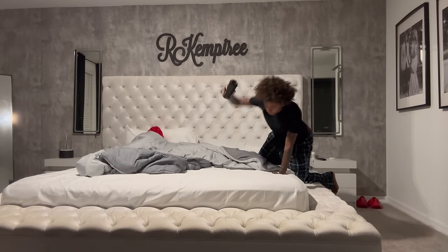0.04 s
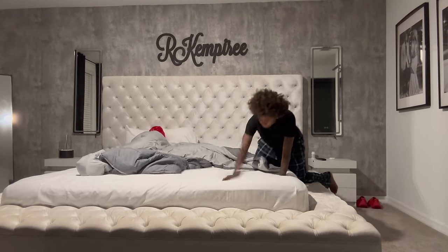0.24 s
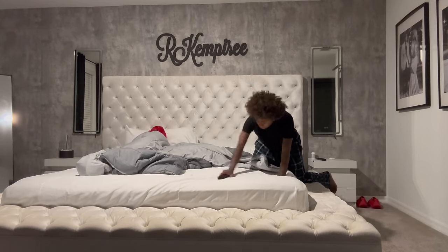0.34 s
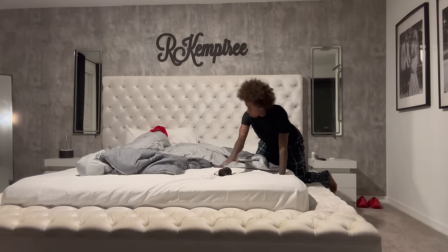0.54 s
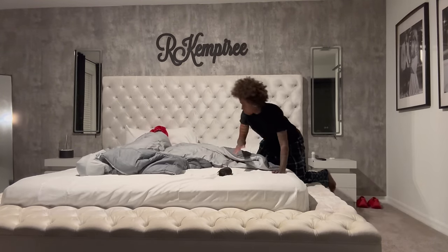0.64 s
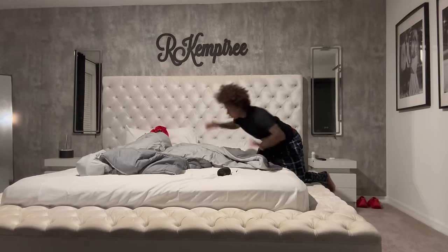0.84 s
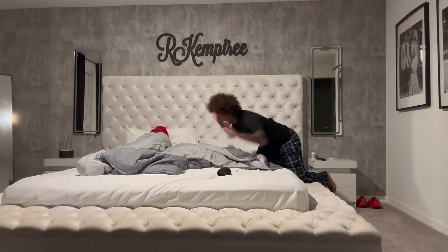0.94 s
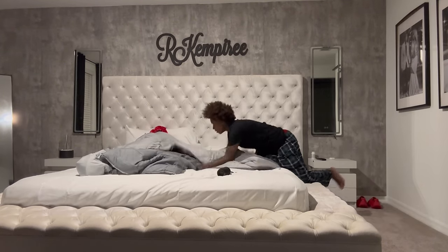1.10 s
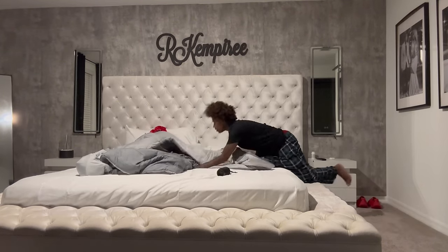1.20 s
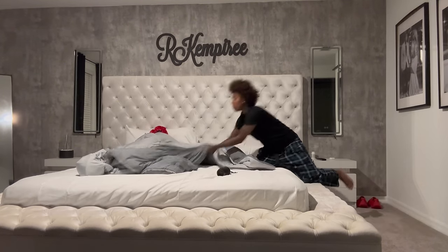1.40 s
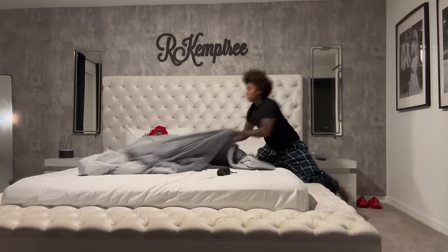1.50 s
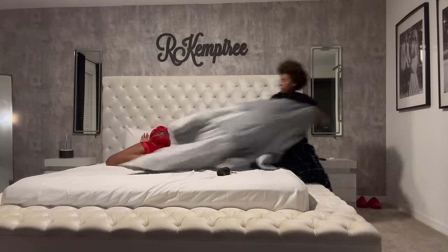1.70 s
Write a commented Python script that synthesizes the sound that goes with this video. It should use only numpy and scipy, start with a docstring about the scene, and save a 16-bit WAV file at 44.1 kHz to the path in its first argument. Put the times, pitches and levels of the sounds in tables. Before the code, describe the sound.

A flat hand slaps a mattress at about 0.24 s: a loud, padded smack with a boomy bed ring fading within half a second. Faint cloth brushes follow. Near 1.04 s a softer pat, hollow knock and low thuds mark a lunge onto the comforter. From 1.3 s to the end it is pulled away, quietly billowing, swishing and crinkling, with dull thuds near 1.6 s. Small room, low hush.

```python
"""A flat hand slaps a mattress: a padded smack of shaped noise, with the bed ringing on as fading tones.
Someone kneeling on the bed then lunges onto the comforter, heard as a soft pat, low thuds and a hollow
knock, and pulls it away: noise that billows and swishes, and a dense crackle of tiny clicks that crinkles.
Small ticks, brushes, knocks and rustles of noise fill in around these, over a steady hush.
A small, fairly bare bedroom adds a fading tail to all but the hush, the thuds and the bed's ringing."""
import sys
import numpy as np
from scipy import signal
from scipy.fft import rfft, irfft
from scipy.io import wavfile

SR = 44100
rng = np.random.default_rng(int(sys.argv[2]) if len(sys.argv) > 2 else 0)


def inscribe(sig):
    """Save sig as 16-bit PCM at rate SR to the path in sys.argv[1].

    A 1-D sig is mono; a 2-D sig holds one channel per row.
    Samples are clipped to [-1, 1] before scaling.
    """
    pcm = np.round(np.clip(np.atleast_2d(sig).T, -1, 1) * 32767)
    wavfile.write(sys.argv[1], SR, pcm.astype(np.int16))


N = 77175  # length [samples]


def amp(db):
    """Turns decibels into a gain."""
    return 10 ** (np.asarray(db) / 20)


def read(points, hz):
    """Reads a table between its points, with frequency on a log scale."""
    f, value = np.transpose(points)
    return np.interp(np.log(hz + 1), np.log(f + 1), value)


def since(s):
    """Seconds passed since time s, zero before it."""
    return np.maximum(np.arange(N) / SR - s, 0)


def stroke(s, rise, hold, fall):
    """Loudness shape: a straight rise, then an exponential fall from `hold` seconds after the start."""
    t = since(s)
    return np.minimum(t / rise, 1) * np.exp(-np.maximum(t - hold, 0) / fall)


# How wide the stereo is, as side against middle: (frequency [Hz], level [dB])
STEREO_WIDTH = [(60, -12.5), (110, -11), (200, -10), (380, -9), (700, 1), (1300, -4), (4000, 2),
                (15000, -1)]


def coloured(colour, drive=None):
    """Filters noise (or `drive`) to a spectrum, near mono in the bass and wide in the treble."""
    hz = np.fft.rfftfreq(N, 1 / SR)
    if drive is None:
        drive = rng.standard_normal((2, N))
    mid, side = rfft(drive) * amp(read(colour, hz))
    side = side * amp(read(STEREO_WIDTH, hz))
    left_right = irfft([mid + side, mid - side], N)
    return left_right / np.std(irfft(mid, N))  # only the shape of the colour counts, not its level


# How long the bedroom takes to fade by 60 dB: (frequency [Hz], time [s])
ROOM_FADE = [(60, 0.69), (150, 0.47), (400, 0.3945), (900, 0.2744), (2000, 0.41), (5000, 0.3324),
             (12000, 0.32)]


def room(x, wet_db, gap_s=0.0045):
    """Adds the bedroom's diffuse tail: noise after a short gap, each band dying at its own speed."""
    hz, t, (mid, side) = signal.stft(rng.standard_normal((2, N)), SR, nperseg=1024)
    width = amp(read(STEREO_WIDTH, hz))[:, None]
    bands = np.array([mid + width * side, mid - width * side]) / np.sqrt(1 + width ** 2)
    decay = amp(-60 * t / read(ROOM_FADE, hz)[:, None])
    tail = signal.istft(bands * decay, SR, nperseg=1024)[1][:, :N]
    tail = tail * stroke(gap_s, 0.0034, 2, 1)  # the hold outlasts the sound: this only shapes the start
    tail = tail / np.linalg.norm(tail[0])
    return x + amp(wet_db) * signal.fftconvolve(x, tail, axes=1)[:, :N]


# Spectrum of the quiet room: (frequency [Hz], relative level [dB per Hz])
HUSH_COLOUR = [(20, -26), (40, -7), (65, -3), (100, -9), (160, -14), (230, -19), (345, -15), (450, -21),
               (720, -27), (1000, -34), (1350, -34), (1900, -36), (2800, -47), (4300, -48), (6000, -50),
               (13000, -58), (15000, -66)]


def hush():
    """The room's steady background is quiet noise, strongest in the bass."""
    return amp(-60.5) * coloured(HUSH_COLOUR)


# Loose folds of cloth stirring: (time [s], level [dB], rise [s], fall [s])
RUSTLES = [(0, -74, 0.0067, 0.088), (0.169, -74.5, 0.034, 0.056), (0.451, -73.5, .035, 0.011),
           (0.979, -70, 0.0062, 0.021), (1.044, -62.5, 0.022, 0.077), (1.304, -66, .007, 0.016)]
# Spectrum of the folds: (frequency [Hz], relative level [dB per Hz])
RUSTLE_COLOUR = [(500, -11), (1500, -1.5), (3000, -2.5), (4500, -0.5), (6000, -3), (8300, 2.5),
                 (13000, -3.5), (15000, -27)]


def rustles():
    """Loose folds stirring make soft swells of hiss."""
    shape = sum(amp(db) * stroke(s, rise, rise, fall) for s, db, rise, fall in RUSTLES)
    return room(shape * coloured(RUSTLE_COLOUR), wet_db=-1.5)


# Small snaps of cloth and skin: (time [s], level [dB], fall [s])
TICKS = [(0.0736, -55.5, .004), (0.237, -31.5, 0.00073), (1.043, -44, 0.001), (1.31, -60, 0.0038)]
# Spectrum of the snaps: (frequency [Hz], relative level [dB])
TICK_COLOUR = [(100, -7.5), (700, -1), (1300, 0), (2600, -15.5), (6000, -12), (7900, -8), (10500, -14),
               (14000, -35)]


def ticks():
    """Cloth and skin snap in very short bursts of noise."""
    shape = sum(amp(db) * stroke(s, .0005, .001, fall) for s, db, fall in TICKS)
    return room(shape * coloured(TICK_COLOUR), wet_db=0.5)


# Short brushes against the bedding: (time [s], level [dB], rise [s], fall [s])
BRUSHES = [(0.074, -56.5, .004, 0.024), (0.225, -38, 0.0082, 0.0042), (0.468, -54.5, 0.043, 0.0087),
           (0.639, -60.5, 0.054, 0.11), (1.034, -43, 0.0028, 0.006), (1.309, -48.5, 0.019, 0.011),
           (1.598, -47.5, 0.022, 0.011)]
# Spectrum of the brushes: (frequency [Hz], relative level [dB per Hz])
BRUSH_COLOUR = [(60, -14.5), (130, -4.5), (220, -7), (430, -7), (700, -14), (1300, -18), (2200, -20.5),
                (3200, -35.5), (4600, -32), (8000, -36.5), (13500, -40.5), (15000, -62.5)]


def brushes():
    """Hands and knees rub the bedding in short swells of dull noise."""
    shape = sum(amp(db) * stroke(s, rise, rise, fall) for s, db, rise, fall in BRUSHES)
    return room(shape * coloured(BRUSH_COLOUR), wet_db=-4)


# Light knocks of the bed frame: (time [s], level [dB])
KNOCKS = [(0.075, -60), (0.123, -58)]
# Spectrum of the knocks: (frequency [Hz], relative level [dB])
KNOCK_COLOUR = [(300, -23.5), (950, -13.5), (1300, 3), (1550, -9), (2000, -17.5), (5000, -42.5)]


def knocks():
    """The bed frame knocks in short bursts of noise gathered around one pitch."""
    shape = sum(amp(db) * stroke(s, rise=.002, hold=.0014, fall=.007) for s, db in KNOCKS)
    return room(shape * coloured(KNOCK_COLOUR), wet_db=-4)


SLAP_S, SLAP_DB = 0.238, -12.5  # when the hand lands, and the level of its smack
# Spectrum of the hand on the taut mattress: (frequency [Hz], relative level [dB per Hz])
SLAP_COLOUR = [(22, -41.5), (45, -16), (100, -13), (190, -11), (250, -16), (320, -4.5), (440, -15.5),
               (540, -9.5), (640, -19.5), (760, -10.5), (950, -30), (1350, -23), (1700, -26.5),
               (2200, -32.5), (3000, -42), (4000, -39), (6500, -45.5), (8300, -48), (12500, -53),
               (15000, -57)]
# Tones the struck bed rings with: (frequency [Hz], level [dB], time to fade by 60 dB [s])
BED_TONES = [(44.8, -25, 0.61), (65.7, -18, 0.51), (82.4, -13, 0.36), (142.9, -17, 0.43),
             (172.1, -18.5, .28), (207.3, -10.5, 0.19), (268, -22, 0.35), (299.4, -15, 0.26),
             (370, -22, 0.24), (526.3, -20, .24), (550.5, -17.5, .24), (716, -18.5, .2), (771, -23.5, 0.28),
             (813, -23.5, 0.22), (1079, -34.5, 0.28), (1349, -30, 0.25)]
BED_RISE_S, BED_SPREAD = .005, .6  # fade-in; left-right phase scatter [radians], scaled by stereo width


def slap():
    """The hand smacks the sheet as a noise burst and sets the bed ringing in many fading tones."""
    shape = stroke(SLAP_S, rise=.0012, hold=.011, fall=.006)
    smack = amp(SLAP_DB) * shape * coloured(SLAP_COLOUR)
    t = since(SLAP_S)
    ring = np.zeros((2, N))
    for k, (hz, db, fade_s) in enumerate(BED_TONES):
        scatter = BED_SPREAD * amp(read(STEREO_WIDTH, hz)) * rng.standard_normal((2, 1))
        phase = np.pi * k + scatter  # every second tone starts upside down
        ring += amp(db - 60 * t / fade_s) * np.sin(2 * np.pi * hz * t + phase)
    return room(smack, wet_db=-3) + ring * np.minimum(t / BED_RISE_S, 1)


# Low thuds of weight on the mattress, and one hollow knock (293 Hz) as the arm lands:
# (time [s], level [dB], frequency [Hz], time to fade by 60 dB [s])
THUDS = [(0.715, -39, 60, 0.096), (0.784, -43.5, 60.4, 0.098), (1.046, -24, 293, 0.12),
         (1.074, -19.5, 84.5, 0.22), (1.079, -26.5, 45, 0.51), (1.101, -27, 125.6, 0.14),
         (1.148, -19, 71.5, 0.11), (1.234, -46, 57, 0.16), (1.321, -47, 62, 0.17), (1.382, -43, 64.7, 0.28),
         (1.606, -37, 76.4, 0.38), (1.663, -29.5, 53.7, 0.3)]
THUD_RISE_S = 0.012


def thuds():
    """Low thuds of weight on the mattress, and one hollow knock as the arm lands, each one fading tone."""
    total = np.zeros(N)
    for s, db, hz, fade_s in THUDS:
        t = since(s)
        loudness = amp(db - 60 * t / fade_s) * np.minimum(t / THUD_RISE_S, 1)
        total += loudness * np.sin(2 * np.pi * hz * t)
    return total


PAT_S, PAT_DB = 1.040, -24.5  # when the arm lands, and how loud
# Spectrum of the arm on the soft comforter: (frequency [Hz], relative level [dB per Hz])
PAT_COLOUR = [(30, -33), (150, -7.5), (220, -5), (295, 5.5), (370, 0.5), (440, 1.5), (560, -2.5), (750, -6),
              (1030, -14.5), (1320, -11), (1700, -20.5), (3200, -33), (8200, -44.5), (12800, -52),
              (15000, -63)]


def pat():
    """The arm lands on the comforter, a noise burst softer and slower than the slap."""
    shape = stroke(PAT_S, rise=0.0085, hold=0.018, fall=0.012)
    return room(amp(PAT_DB) * shape * coloured(PAT_COLOUR), wet_db=-4.5)


# The pulled comforter, levels before the trims below:
# (time [s], billow level [dB], swish level [dB], crinkle level [dB])
PULL = [(1.29, -58, -65, -65), (1.318, -62, -67, -71), (1.332, -43.5, -74, -70), (1.368, -54.5, -82.5, -78),
        (1.406, -57.5, -65.5, -74.5), (1.51, -52.5, -52, -64.5), (1.572, -48, -58, -61),
        (1.594, -46.5, -70, -65), (1.632, -47.5, -52.5, -61), (1.654, -49, -64, -61.5),
        (1.726, -49, -69, -74.5), (1.75, -49.5, -53.5, -85)]
# Spectra of the three cloth sounds: (frequency [Hz], relative level [dB])
BILLOW_COLOUR = [(40, -2.5), (100, 4.5), (200, 2), (450, -0.5), (700, -7.5), (1100, -21), (3000, -33.5)]
SWISH_COLOUR = [(300, -5), (800, 2), (1400, 4.5), (2200, -6.5), (3000, -9.5), (4500, -12), (10000, -20)]
CRINKLE_COLOUR = [(1500, -30), (3000, -14.5), (3750, 6), (4500, -2), (8000, 2), (10000, 3.5), (13000, 1),
                  (15000, -13)]
BILLOW_TRIM_DB, SWISH_TRIM_DB, CRINKLE_TRIM_DB = 0, -0.5, -0.5
CREASES_PER_S, CREASE_SPREAD_DB = 3500, 1  # average rate of clicks; how much their strength varies


def pull():
    """The comforter billows and slides over the sheet as noise; its creases snap in a dense crackle."""
    s, billow_db, swish_db, crinkle_db = np.transpose(PULL)
    t = np.arange(N) / SR
    clicks = rng.random(N) < CREASES_PER_S / SR
    strength = amp(CREASE_SPREAD_DB * np.minimum(rng.exponential(1, N), 4))
    creases = rng.standard_normal((2, N)) * clicks * strength
    billow = amp(BILLOW_TRIM_DB + np.interp(t, s, billow_db)) * coloured(BILLOW_COLOUR)
    swish = amp(SWISH_TRIM_DB + np.interp(t, s, swish_db)) * coloured(SWISH_COLOUR)
    crinkle = amp(CRINKLE_TRIM_DB + np.interp(t, s, crinkle_db)) * coloured(CRINKLE_COLOUR, creases)
    start = stroke(s[0], .01, 2, 1)  # silent until the pull, then on to the end
    return room((billow + swish + crinkle) * start, wet_db=-4.5)


LEFT_DB = .6  # left is raised and right lowered by this much


def scene():
    """All the sounds of the bed over the hush of the room, leaning slightly left."""
    small_touches = rustles() + ticks() + brushes() + knocks()
    everything = hush() + small_touches + slap() + thuds() + pat() + pull()
    return everything * amp([[LEFT_DB], [-LEFT_DB]])


EDGE_HZ = 14000  # treble above this is cut


def record(dry):
    """The microphone has a narrow treble dip and rounds off the highest peaks; then the treble is cut."""
    hz = np.fft.rfftfreq(2 * N, 1 / SR)
    dip_db = read([(8500, 1), (9400, -9), (10000, -13), (10700, -2)], hz)
    heard = irfft(rfft(dry, 2 * N) * amp(dip_db))[:, :N]
    heard = heard / (1 + heard ** 8) ** (1 / 8)  # quiet sound passes almost unchanged
    low_pass = signal.firwin(255, EDGE_HZ, window=("kaiser", 8), fs=SR)
    return signal.oaconvolve(heard, low_pass[None], "same")


dry = scene()
out = record(dry)
inscribe(out)
```